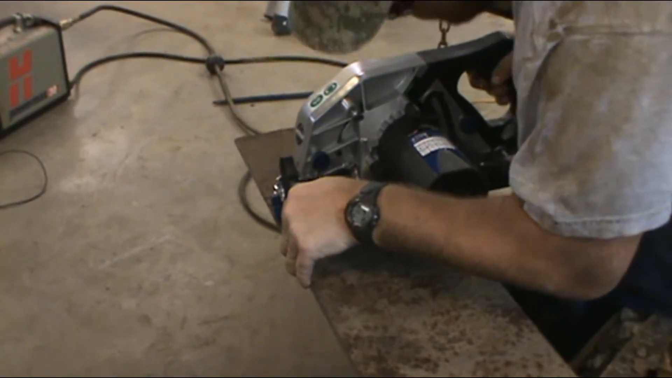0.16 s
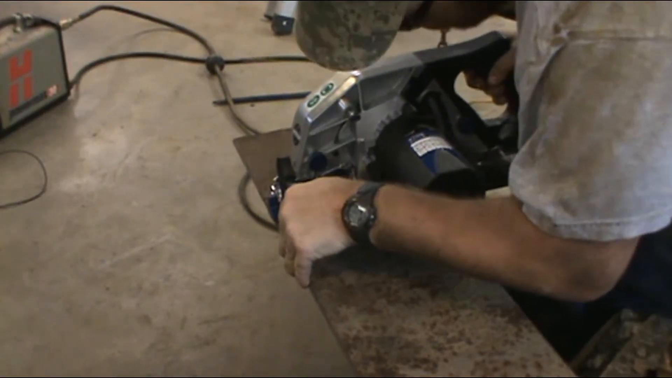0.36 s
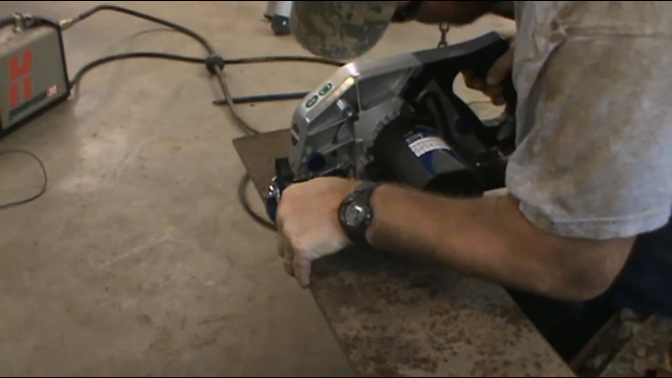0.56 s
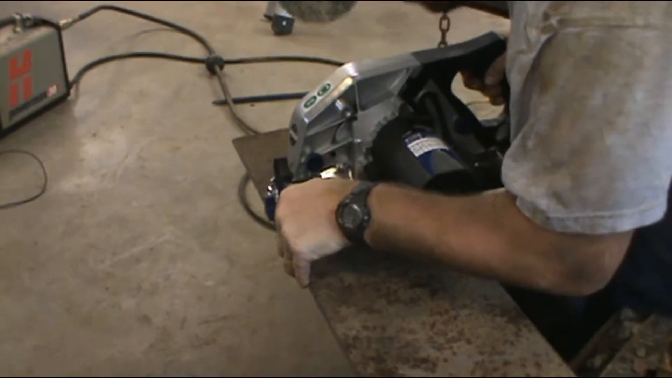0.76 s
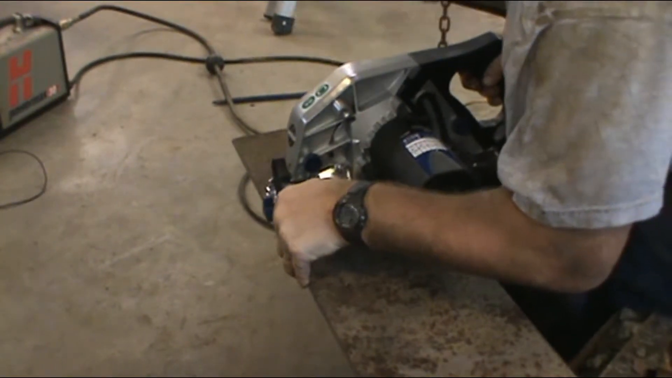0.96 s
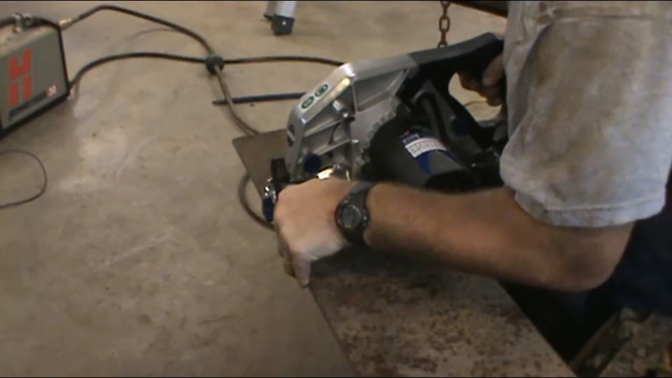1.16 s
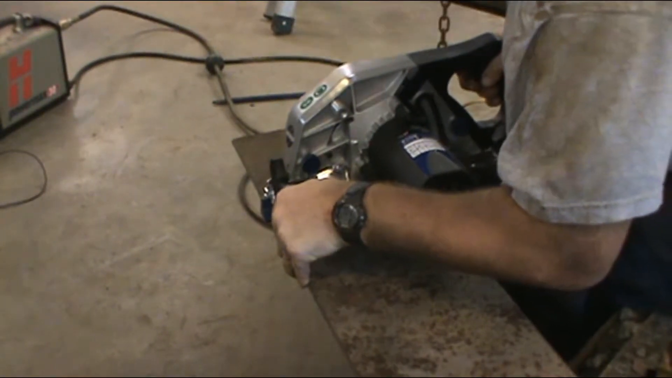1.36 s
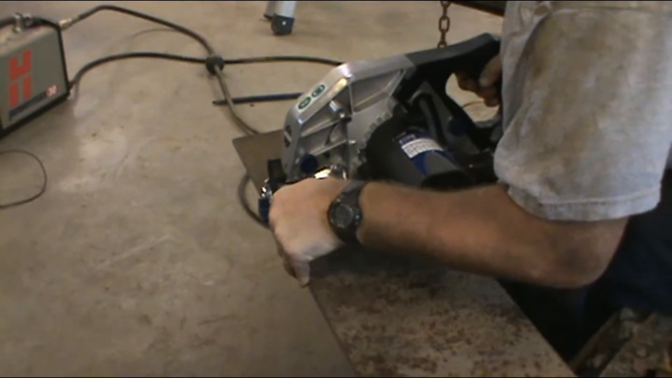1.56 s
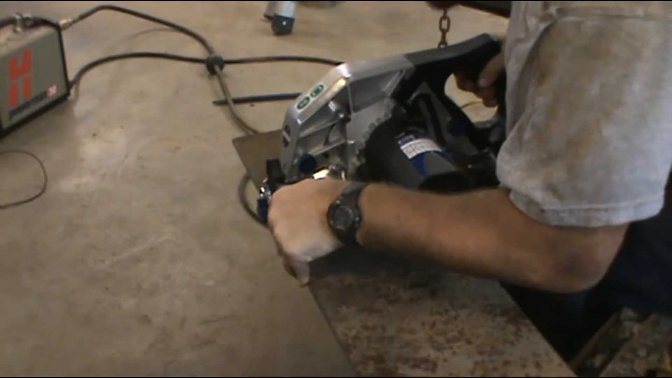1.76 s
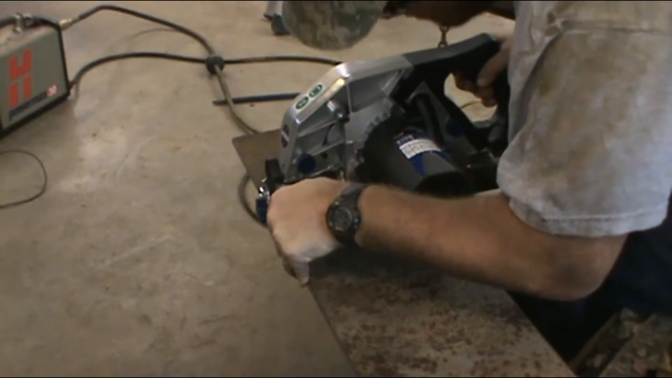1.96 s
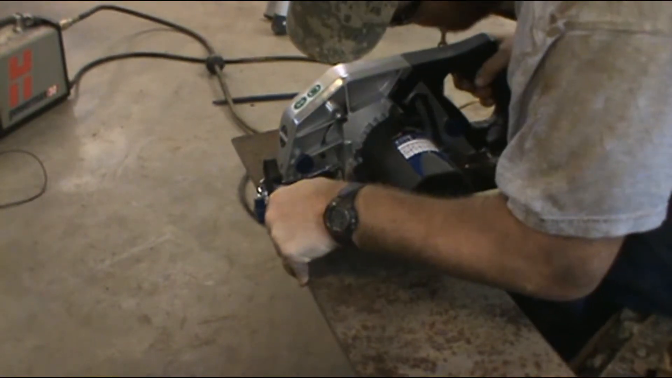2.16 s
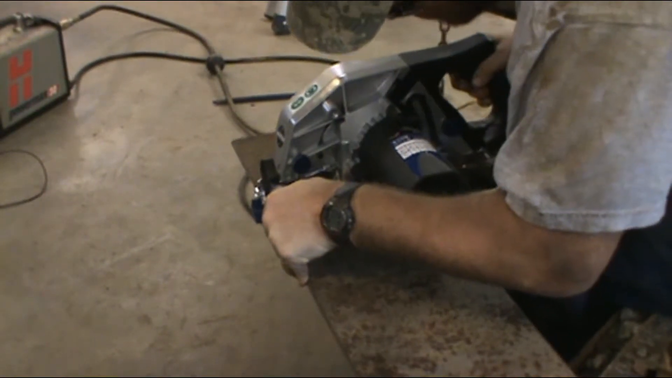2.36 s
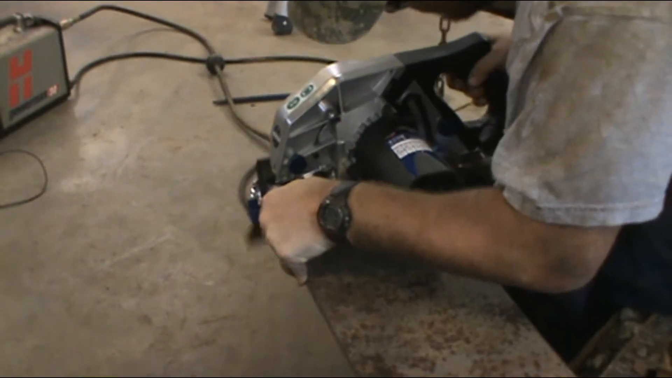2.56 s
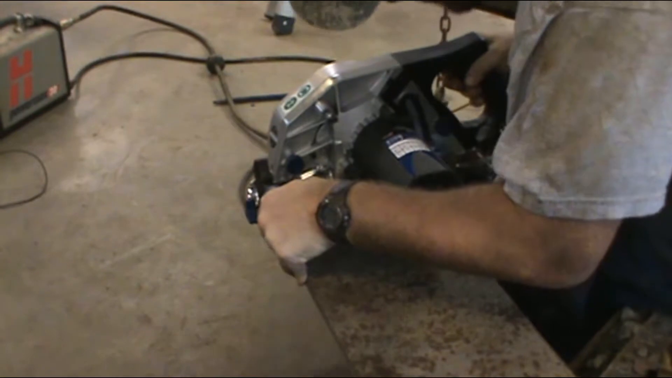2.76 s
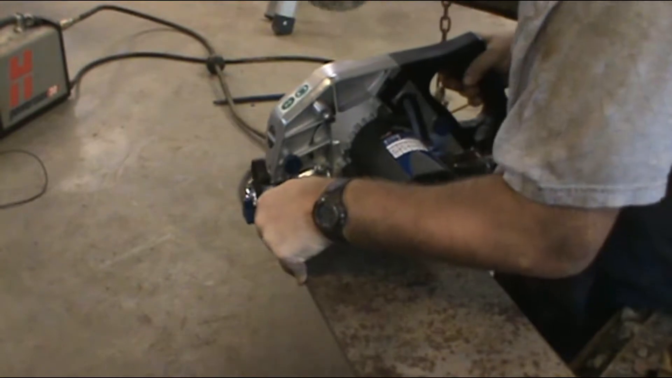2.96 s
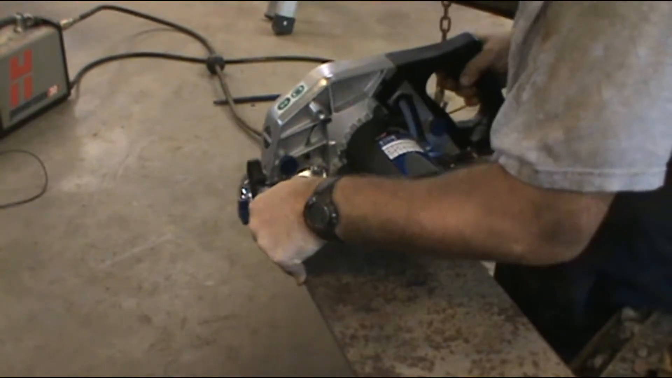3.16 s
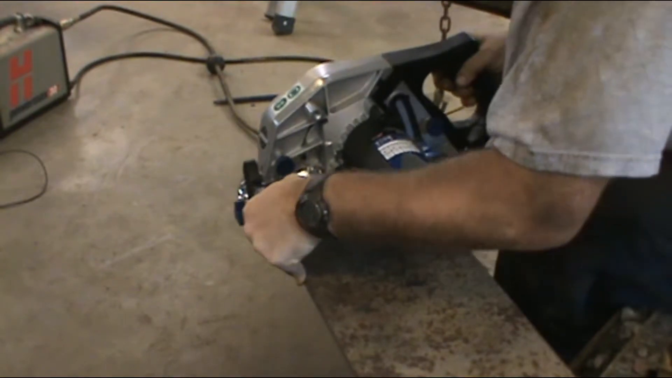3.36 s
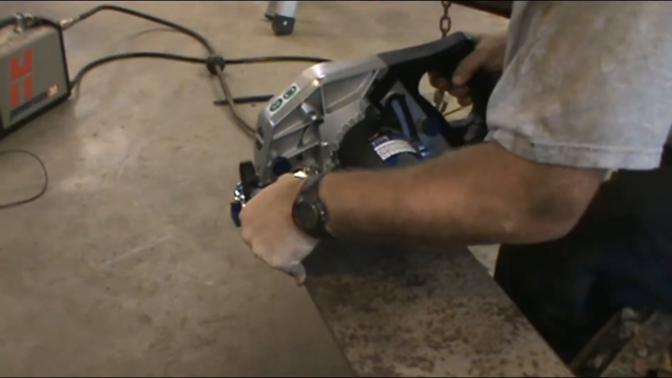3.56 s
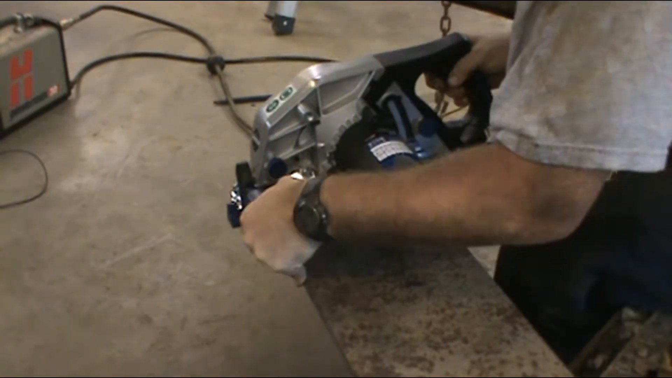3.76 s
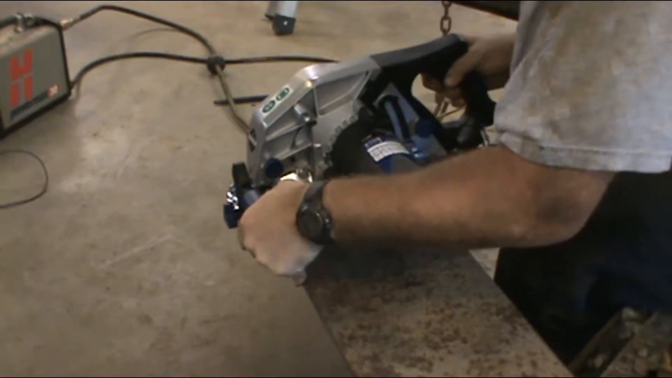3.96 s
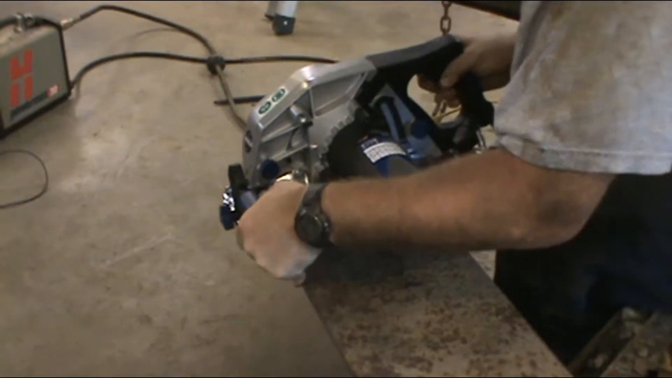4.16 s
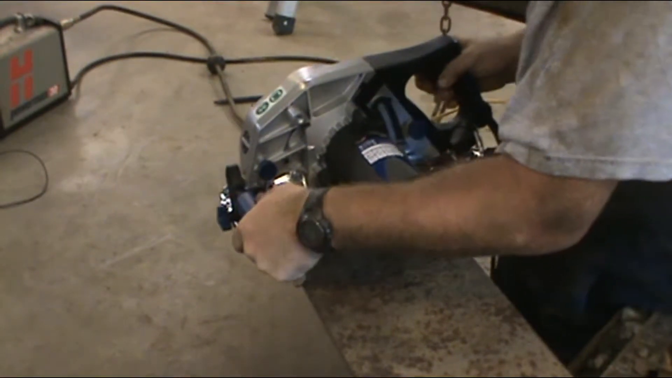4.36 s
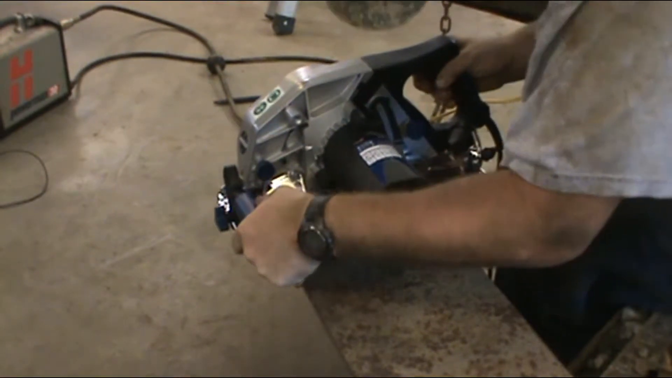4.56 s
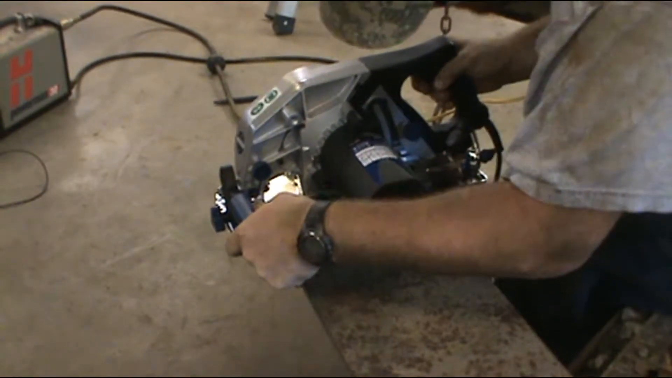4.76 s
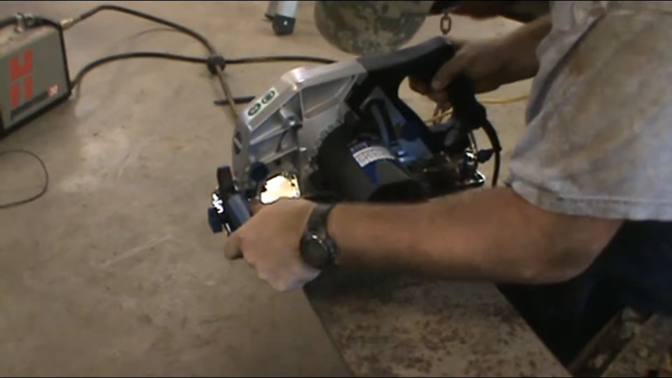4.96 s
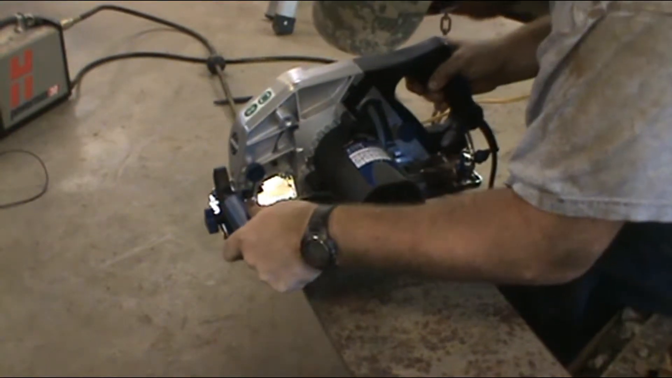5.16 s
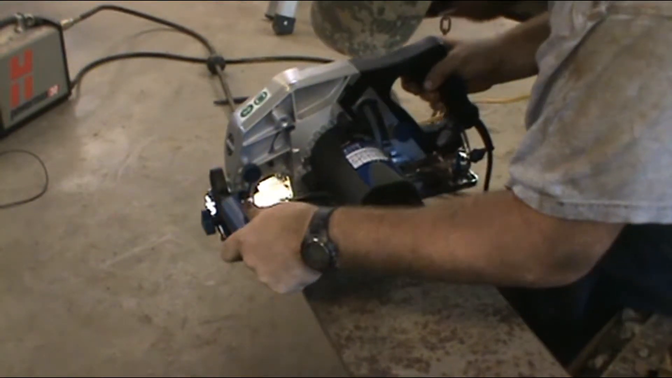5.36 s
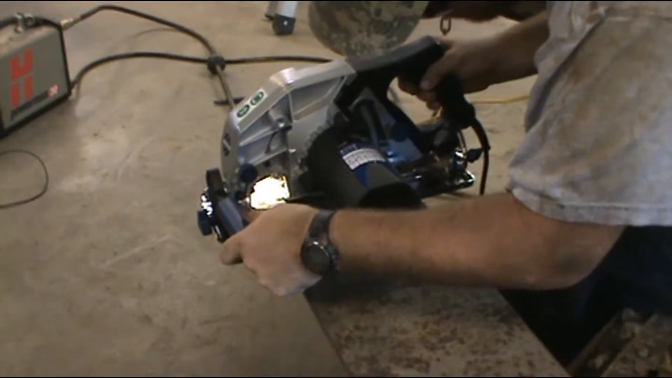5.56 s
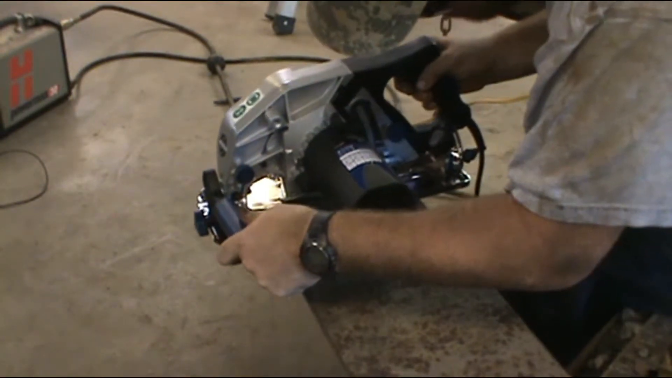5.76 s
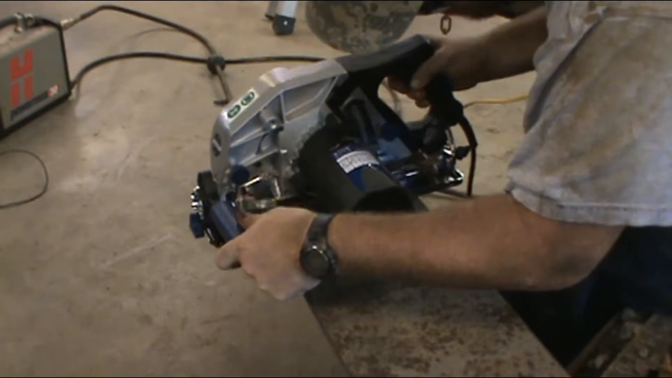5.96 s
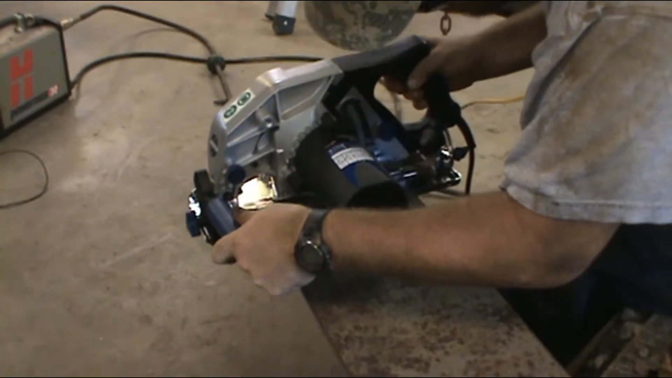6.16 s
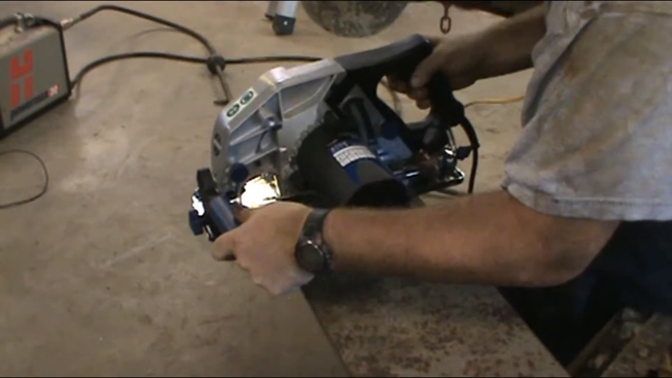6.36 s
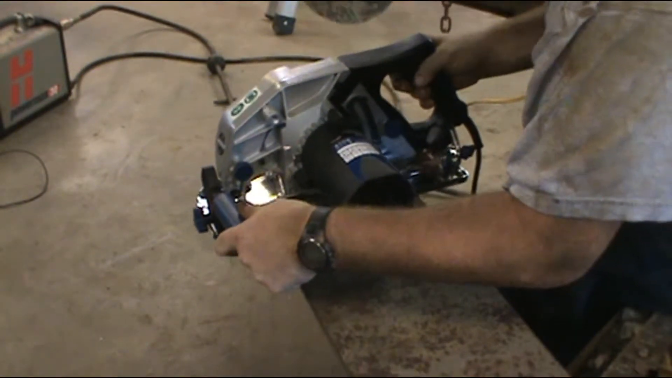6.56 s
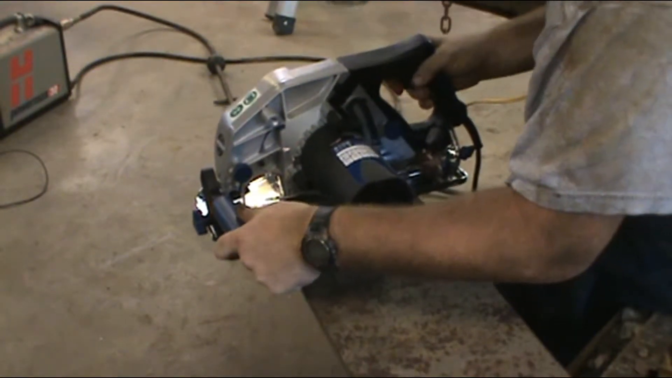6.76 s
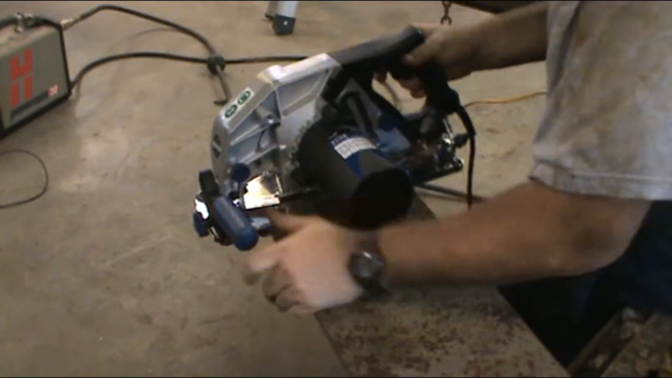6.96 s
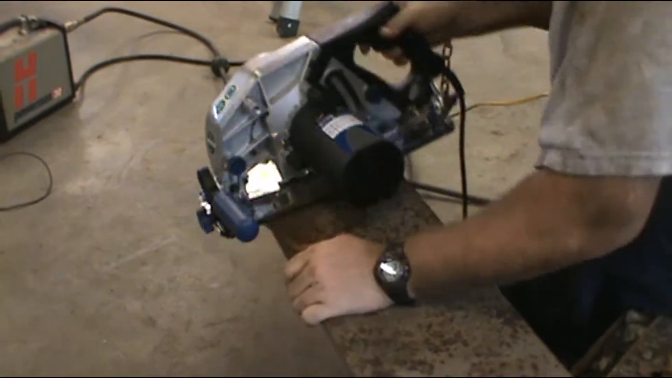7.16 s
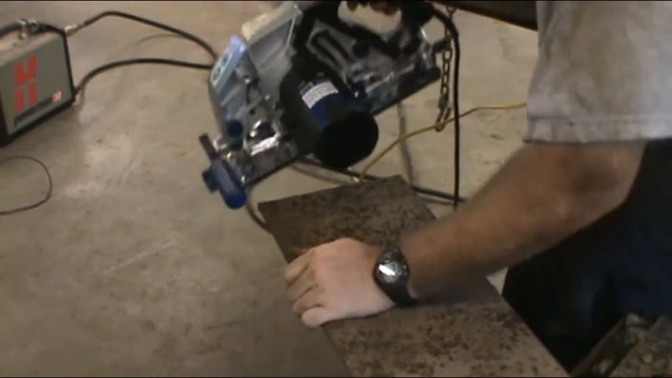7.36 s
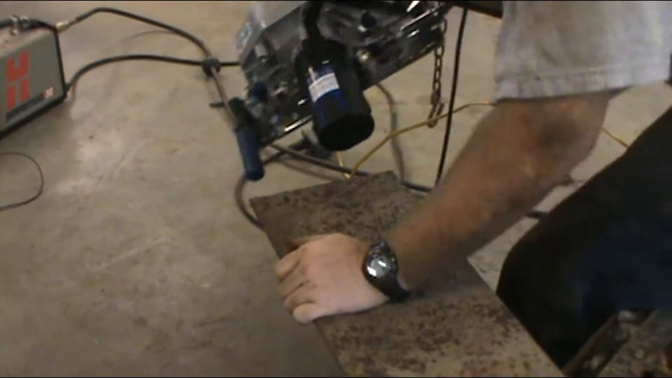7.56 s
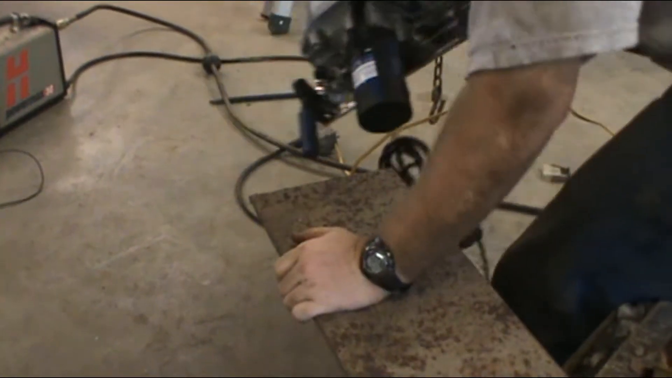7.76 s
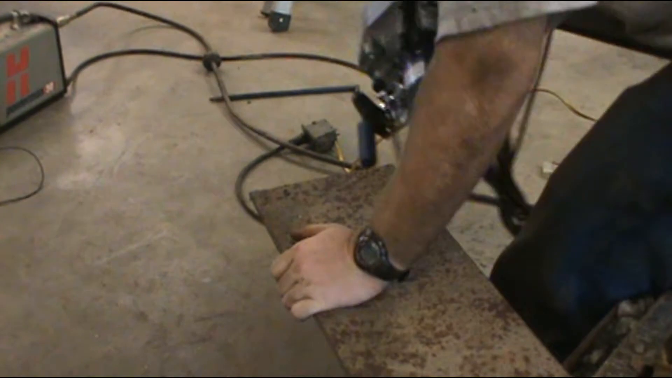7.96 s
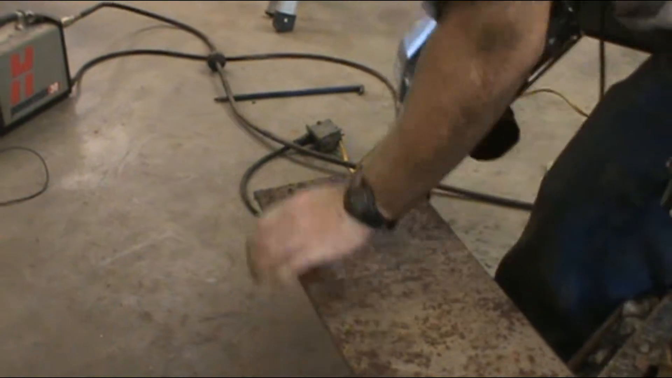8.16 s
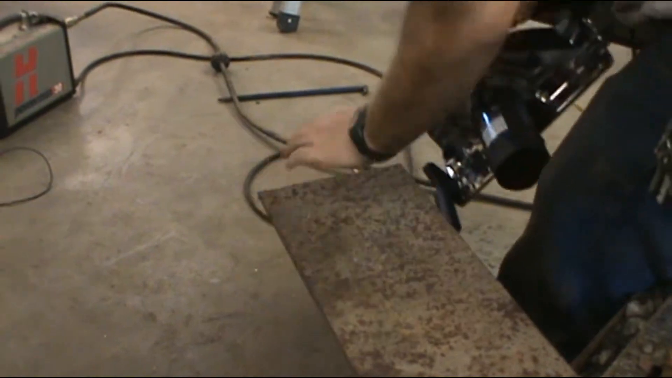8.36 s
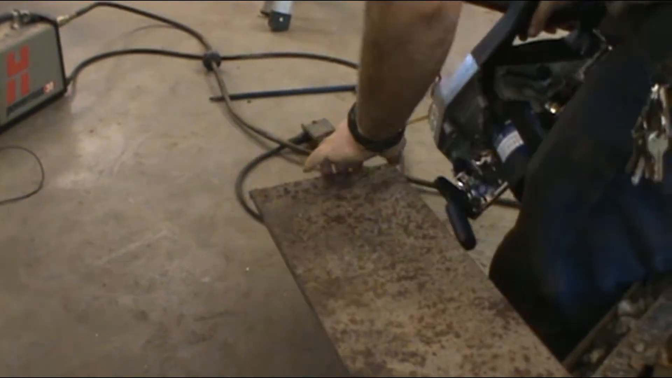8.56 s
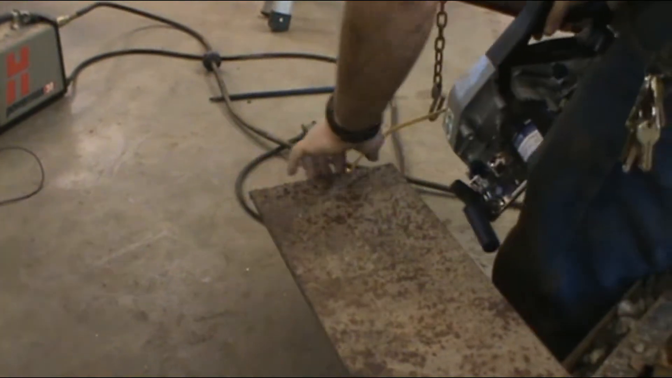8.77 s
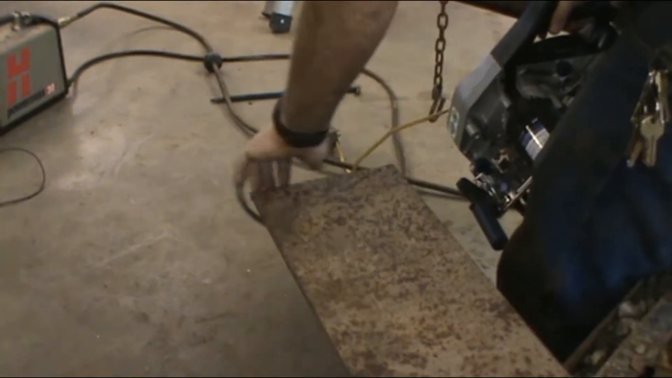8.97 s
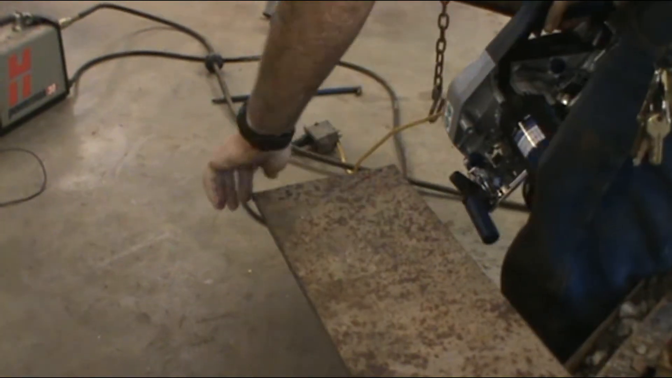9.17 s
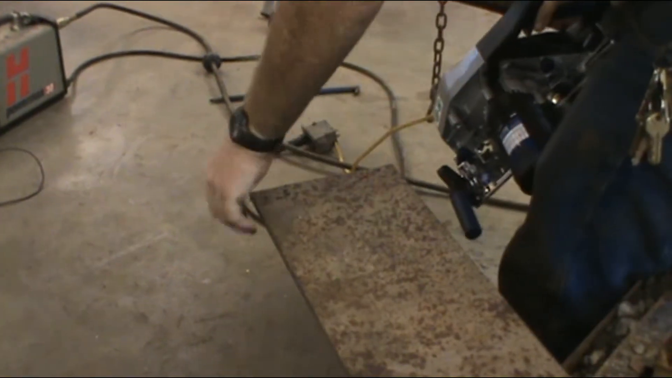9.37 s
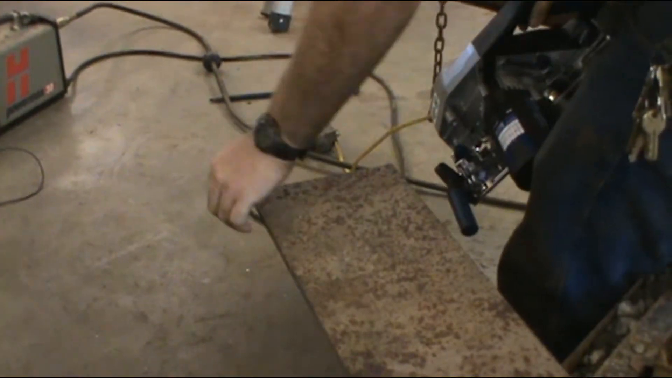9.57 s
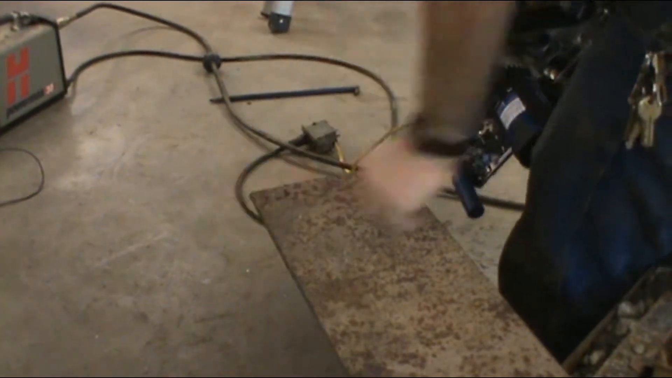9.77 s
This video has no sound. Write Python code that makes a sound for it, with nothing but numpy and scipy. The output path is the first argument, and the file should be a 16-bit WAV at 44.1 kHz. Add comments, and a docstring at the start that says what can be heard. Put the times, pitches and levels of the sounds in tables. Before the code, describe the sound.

A metal-cutting circular saw, very close to the microphone in stereo: dense gritty scraping, sizzling chips, clanking guard and shaking plate. Midway come pinched squeals and squeaks, then a singing tooth whine. Near six seconds the cut ends with a short metallic ring; the motor speeds up, is switched off, and its fan noise and gear rattle sink in pitch, with a dull bump and short room reflections.

```python
"""A hand-held circular saw cuts through steel plate in a workshop, close to the microphone.
Its teeth scrape: noise in tooth-rate bursts rings steel resonances; tones whine as the load eases.
The blade snags, squeals and squeaks in its bending modes; the plate shakes as low stereo rumble.
It breaks through, the motor races briefly, and it coasts down: fan noise, speed-following tones and
gears that rattle as noise pulsed about once a motor turn."""
import sys
import numpy as np
from scipy import signal
from scipy.fft import rfft, irfft
from scipy.io import wavfile
from scipy.ndimage import uniform_filter1d

SR = 44100
rng = np.random.default_rng(int(sys.argv[2]) if len(sys.argv) > 2 else 0)


def int16_out(signal):
    """Quantize to a 16-bit WAV file."""
    q = np.round(np.clip(np.atleast_2d(signal).T, -1, 1) * 32767)
    wavfile.write(sys.argv[1], SR, q.astype(np.int16))


N = 432610
TIME, FREQS = np.arange(N) / SR, np.fft.rfftfreq(N, 1 / SR)  # s, Hz

GEAR_RATIO, TEETH = 7.2, 40  # motor turns per blade turn; teeth on the blade
EXIT_S, FREE_S = 5.91, 5.97  # the last teeth start to leave the plate; the blade comes free
EDGE_HZ = 15900  # upper band limit

# snags of the blade, before each layer's trim:
# (t/s, length/s, lowest mode level/dB, upper modes level/dB, scrape level/dB)
SNAGS = [(2.814, .045, -16, -15, -12), (3.21, .07, -14, -16, -14), (3.383, .035, -16, -23, -17),
         (3.46, .1, -23, -33, -28)]
# how hard the saw is fed into the plate, as the level of the plate's shaking: (t/s, level/dB)
FEED = [(0.0, -35.5), (0.56, -44), (0.92, -35), (1.38, -46), (1.58, -32), (2.1, -44.5), (2.32, -31),
        (2.94, -36), (3.24, -29), (3.29, -35.5), (4.08, -29.5), (4.98, -47.5), (5.75, -44), (5.9, -43)]


def amp(db):
    """Decibels to gain."""
    return 10 ** (np.asarray(db) / 20)


def evened(x):
    """Scales to rms 1."""
    return x / np.sqrt(np.mean(x ** 2) + 1e-20)


def curve(rows):
    """The second column of a table, joined by straight lines in time."""
    times, values = np.array(rows).T
    return np.interp(TIME, times, values)


def wander(hz):
    """Slow chance of rms 1, up to about hz."""
    spectrum = rfft(rng.standard_normal(N))
    return evened(irfft(spectrum / (1 + (FREQS / hz) ** 4), N))


def ring(x, body, modes=(), contrast=0.82):
    """Passes x through a smooth response; any resonances stand on it among a thicket of weak ones."""
    hz, db = np.transpose(body)
    lift = np.ones(len(FREQS))
    for centre_hz, width_hz, lift_db in modes:
        lift += amp(lift_db) ** 2 / (1 + (2 * (FREQS - centre_hz) / width_hz) ** 2) ** 2
    # random ripple along frequency, full above 2 kHz
    thicket_db = 2.3 * wander(90)[:len(FREQS)] * np.minimum(FREQS / 2000, 1) * (len(modes) > 0)
    smooth_db = np.interp(np.log(FREQS + 1), np.log(hz), db)
    response = amp(smooth_db + thicket_db) * np.sqrt(lift) ** contrast
    response /= np.sqrt(1 + (hz[0] / (FREQS + 1)) ** 6)  # low cut at the body's lowest point
    return evened(irfft(rfft(x) * response, N))


def tone(hz, waver, waver_hz=60):
    """A sine of rms 1 whose pitch trembles by an rms share of waver."""
    turns = np.cumsum(hz * (1 + waver * wander(waver_hz))) / SR
    return np.sqrt(2) * np.sin(2 * np.pi * (turns + rng.random()))


def snag_gain(s, length, db, rise=.005, release=.028):
    """A gain that builds in a straight line from s, holds, and dies away exponentially (times in s)."""
    build = np.clip((TIME - s) / rise, 0, 1)
    return amp(db) * build * np.exp(-np.maximum(TIME - s - length, 0) / release)


def motor_speed():
    """Turns per second: held down by the cut, running up once free, coasting after switch-off."""
    # motor speed under the load of the cut: (t/s, f/Hz)
    loaded_rows = [(0, 216), (1.1, 215), (2.0, 245), (3.1, 230), (4.2, 252), (4.6, 291), (4.75, 296),
                   (4.95, 308), (5.28, 304), (5.55, 321)]
    top_hz, run_up_s = 385, .5  # speed it runs up towards, and the time constant
    off_s = 6.76  # trigger released
    drag_s, friction_hz_per_s = 2.0, 29  # air drag's time constant, and constant friction
    loaded = uniform_filter1d(curve(loaded_rows), size=2000, mode="nearest")
    free_s = np.clip(TIME - FREE_S, 0, off_s - FREE_S)
    driven = top_hz + (loaded - top_hz) * np.exp(-free_s / run_up_s)
    friction = friction_hz_per_s * drag_s
    return (driven + friction) * np.exp(-np.maximum(TIME - off_s, 0) / drag_s) - friction


def contact(exit_db_per_s=103):
    """Gain of 1 while the teeth are in the steel, dying quickly as the last ones leave it."""
    return amp(-exit_db_per_s * np.maximum(TIME - EXIT_S, 0))


def effort(db, per_feed, column):
    """Gain of a cutting layer: db at average feed, per_feed dB per dB of feed, swelling at each bite."""
    # the teeth dig in and throw chips, scraping hardest near the end of the cut:
    # (middle t/s, length/s, scrape level/dB, chips level/dB)
    bite_rows = [(0.428, 0.3, -17.5, -33), (0.762, 0.16, -16.5, -34), (1.508, 0.094, -15.5, -37),
                 (2.615, 0.19, -16, -21.5), (3.868, 0.16, -17, -28), (4.26, 0.088, -17.5, -34),
                 (5.732, 0.22, -10, -24)]
    feed_db = curve(FEED)
    feed_db = feed_db - np.mean(feed_db[TIME < FREE_S])
    bites = 0
    for row in bite_rows:
        swell = amp(row[column]) * np.exp(-2 * ((TIME - row[0]) / row[1]) ** 2)
        bites = bites + swell ** 2
    return contact() * np.sqrt(amp(db + per_feed * feed_db) ** 2 + bites)


def shifting(drive, body, modes, contrast):
    """As the teeth move along the slot, the ringing drifts between two sets of weak resonances."""
    angle = .8 * wander(4)
    first, second = (ring(drive * rng.standard_normal(N), body, modes, contrast) for _ in range(2))
    return np.cos(angle) * first + np.sin(angle) * second


def cutting(blade_hz, wobble_db=0.5, bite=0.7, early_db=0.23, late_db=-1.5, spray_db=2,
            snag_db=-3, crack_s=0.011, crack_chips_db=-2):
    """Each tooth tears off a chip: a burst of scraping, decaying over bite tooth gaps, rings the steel."""
    # the steel rings differently as the slot lengthens; broad response: (f/Hz, level/dB),
    # resonances: (f/Hz, width/Hz, lift level/dB before contrast)
    early_body, early_modes = [(400, -32.5), (800, -16.5), (1800, -4), (3500, -8), (5500, -0.5),
                               (9000, -11.5), (11500, -24), (15500, -33)], [(730, 214, 8), (1720, 600, 7), (2727, 149, 4),
                                                   (3583, 45, 9), (4300, 148, 1), (4634, 100, 5),
                                                   (5100, 350, 3), (5760, 130, 6), (6671, 268, 3),
                                                   (7030, 50, 11), (7830, 258, 8), (8290, 157, 8),
                                                   (8792, 83, 7), (9101, 73, 7), (9811, 238, 7)]
    mid_body, mid_modes = [(400, -10.5), (800, 0), (1800, 2.5), (3500, -2), (5500, 2.5), (9000, -4.5),
                           (11500, -21), (15500, -29)], [(687, 56, 4), (1327, 48, 6), (1635, 287, 6), (3010, 71, 6),
                                             (3574, 62, 9), (3780, 39, 11), (4608, 50, 10), (5351, 137, 7),
                                             (5780, 200, 3), (6539, 81, 6), (7249, 43, 13), (7790, 180, 4),
                                             (8629, 25, 12), (9724, 47, 9)]
    late_body, late_modes = [(400, -12.5), (800, -10.5), (1800, 6.5), (3500, -0.5), (5500, 1), (9000, -2.5),
                             (11500, -20), (15500, -26)], [(450, 24, 7), (827, 183, 8), (1705, 36, 8), (2490, 45, 4),
                                                (3519, 43, 5), (3806, 71, 6), (4087, 50, 7), (4225, 30, 11),
                                                (4651, 50, 13), (4897, 31, 9), (5066, 173, 4),
                                                (5858, 171, 6), (6471, 96, 5), (7593, 44, 8),
                                                (9254, 28, 10), (9714, 27, 11)]
    # (t/s, stage of the cut: 0 early, 1 middle, 2 near the edge)
    stage_rows = [(1.9, 0), (2.55, 1), (4.1, 1), (4.55, 2)]
    # broad response of the flying chips: (f/Hz, level/dB)
    sizzle_body = [(7000, 6.5), (10500, -5.5), (15500, -11)]

    turns = np.cumsum(blade_hz) / SR
    bursts = 1 + np.exp(-(turns * TEETH % 1) / bite)
    drive = bursts * amp(wobble_db * np.sin(2 * np.pi * turns) + 0.5 * wander(39))
    stages = [amp(early_db) * shifting(drive, early_body, early_modes, contrast=1.12),
              shifting(drive, mid_body, mid_modes, contrast=0.92),
              amp(late_db) * shifting(drive, late_body, late_modes, contrast=1.35)]
    stage = curve(stage_rows)
    # equal-power crossfade from stage to stage
    steel = sum(np.sqrt(np.maximum(1 - abs(stage - k), 0)) * sound for k, sound in enumerate(stages))
    cracks = amp(snag_db) * sum(snag_gain(s, crack_s, db) for s, *_, db in SNAGS)
    chips = ring(drive * rng.standard_normal(N) * amp(2 * wander(900)), sizzle_body)
    scrape = effort(db=-15.5, per_feed=0.25, column=2)
    spray = effort(db=-36, per_feed=0.33, column=3) * amp(spray_db * wander(11))
    return steel * (scrape + cracks) + chips * (spray + amp(crack_chips_db) * cracks)


def whine(blade_hz, light_db=-22.0, run_out=0.011, flutter_db=1.0, first_db=-33.5, first_fade_db=7):
    """Under light load the teeth strike evenly and sing; the blade's run-out sways the note once a turn."""
    # tooth rate and weaker tones from uneven teeth:
    # (multiple of the blade's turning rate, level/dB, waver as a share)
    order_rows = [(19, -20, .002), (20, -19, .002), (21, -21, .002), (38, -11, .002), (39, -6, .002),
                  (40, 0, .003), (240, -25, .003)]
    # light load: (start t/s, length/s, rise/s, release/s)
    singing_span = (4.4, 1.22, 0.21, 0.064)
    # resonance that swells the tooth tone as it sweeps through: (f/Hz, width/Hz, level/dB)
    whine_peak = (1705, 30, -22.5)

    sway = np.sin(2 * np.pi * np.cumsum(blade_hz) / SR)  # also +-1 dB of level
    start, length, rise, release = singing_span
    singing = snag_gain(start, length, 0, rise, release)
    peak_hz, width_hz, peak_db = whine_peak
    swell = singing * amp(peak_db) / (1 + (2 * (TEETH * blade_hz - peak_hz) / width_hz) ** 2)
    # a fainter whine from the start fades by first_fade_db per second
    strength = amp(light_db) * singing + amp(first_db - first_fade_db * TIME)
    tones = 0
    for k, db, waver in order_rows:
        gain = amp(db) * (strength + swell * (k == TEETH))
        tones = tones + gain * tone(k * blade_hz * (1 + run_out * sway), waver)
    return contact() * amp(sway + flutter_db * wander(70)) * tones


def chatter(level_db=-29, per_s=110, clank_hz=1750, ring_s=0.0035):
    """At random, about 110 times a second, a tooth hits harder and makes the blade guard clank."""
    t = np.arange(SR // 20) / SR
    hits = (rng.random(N) < per_s / SR) * rng.uniform(-0.97, 1, N)
    clank = np.exp(-t / ring_s) * np.sin(2 * np.pi * clank_hz * t)
    return amp(level_db) * contact() * evened(signal.oaconvolve(hits, clank)[:N])


def squeals(ring_s=0.07):
    """A pinched blade rings in its bending modes; the lowest yields first, the upper ones build slower."""
    # modes of the snagged blade, lowest first: (f/Hz, level/dB relative to the snag)
    mode_rows = [(1080, -1), (1556, -3), (2734, -5), (2864, -9), (3370, -4), (4590, -10), (5935, -10)]
    lowest = sum(snag_gain(s, length / 2, db, rise=.006, release=ring_s) for s, length, db, _, _ in SNAGS)
    upper = sum(snag_gain(s, length, db, rise=.01, release=.04) for s, length, _, db, _ in SNAGS)
    modes = [amp(db + 2 * wander(50)) * tone(hz, waver=11 / hz) for hz, db in mode_rows]
    return lowest * modes[0] + upper * sum(modes[1:])


def squeaks(level_db=-1.5, flutter_db=2):
    """The blade's flank sticks and slips, and one mode rings out unsteadily above the rest."""
    # the rubbing blade locks on to a mode: (t/s, length/s, f/Hz, level/dB before level_db)
    squeak_rows = [(.72, .4, 5770, -29), (.88, .2, 7019, -27), (2.42, .1, 6546, -28),
                   (2.815, .06, 7256, -21), (3.215, .09, 4403, -21), (3.33, .09, 4403, -27),
                   (3.46, .13, 2742, -24), (3.63, .52, 4600, -27), (4.0, .15, 1701, -25),
                   (4.25, .2, 3580, -26), (4.27, .25, 4605, -22), (4.4, .05, 1510, -20),
                   (5.05, .29, 2500, -29), (5.18, .15, 4655, -27), (5.45, .3, 4220, -27),
                   (5.54, .28, 3628, -27), (8.76, .17, 2024, -49)]
    t, out = np.arange(SR) / SR, np.zeros(N + SR)
    for s, length, hz, db in squeak_rows:
        noises = rng.standard_normal((2, SR))
        flutter, tremble = (evened(np.convolve(row, np.hanning(600), "same")) for row in noises)
        gain = amp(db + level_db + flutter_db * flutter) * snag_gain(0, length, 0, rise=.02)[:SR]
        turns = hz * t + np.cumsum(10 * tremble) / SR  # pitch trembles by 10 Hz rms
        out[round(s * SR):][:SR] += np.sqrt(2) * gain * np.sin(2 * np.pi * turns)
    return out[:N]


def ring_out(rise_db_per_s=73):
    """The blade's ringing builds until the teeth leave the plate, then dies away."""
    # modes of the freed blade: (f/Hz, level/dB at the exit, 60 dB decay/s)
    ring_rows = [(6470, -23, 0.57), (8800, -37, 1.2)]
    before, after = np.minimum(TIME - EXIT_S, 0), np.maximum(TIME - EXIT_S, 0)
    return sum(amp(db - 60 * after / t60 + rise_db_per_s * before) * tone(hz, waver=0.00072)
               for hz, db, t60 in ring_rows)


def motor(shaft_hz, fan_db=-25.5, fan_power=2.36, whistle_db=-5, hum_db=-32, tones_db=-3,
          tones_power=1.15):
    """The fan rushes and its 12 blades whistle; the rotor hums; the commutator adds thin tones."""
    # broad response of the fan: (f/Hz, level/dB)
    fan_body = [(60, -18), (110, -14), (450, -17.5), (700, 3), (1000, 0.5), (1700, 7), (2800, 0), (4400, 6),
                (8700, -4.5), (11000, -19), (15500, -23)]
    # tones of the 24-bar commutator: (multiple of the shaft rate, level/dB before tones_db and fan_db)
    commutator_rows = [(24, -19), (48, -27), (72, -29), (96, -28)]
    speed = shaft_hz / shaft_hz.max()
    rush = ring(rng.standard_normal(N) * amp(wander(130)), fan_body)
    whistle = amp(whistle_db + 2.5 * wander(70)) * tone(12 * shaft_hz, waver=.005) * speed ** 4
    hum = amp(hum_db) * tone(shaft_hz, waver=.003) * speed ** 2
    tones = 0
    for k, db in commutator_rows:
        in_band = k * shaft_hz < EDGE_HZ
        tones = tones + amp(db + 4 * wander(30)) * tone(k * shaft_hz, waver=.006) * in_band
    fan = speed ** fan_power * (rush + whistle + hum)
    return amp(fan_db) * (fan + speed ** tones_power * amp(tones_db) * tones)


def whirr(shaft_hz, loudest_turns_hz=120, spread=.6, stack_db=-9, count=56):
    """Uneven gear teeth repeat one rough pattern a motor turn; tones stand out as coasting gears run slack."""
    # strongest gear tones: (multiple of the shaft rate, level/dB against the grinding at their loudest)
    order_rows = [(3, -16), (4.8, -17), (13.8, -15), (34.6, -18), (41.5, -16), (56, -20)]
    pattern = irfft(np.exp(2j * np.pi * rng.random(count)), 8192)  # equal harmonics, random phases
    turns = np.cumsum(shaft_hz * (1 + .022 * wander(60))) / SR
    stack = evened(pattern[(turns % 1 * len(pattern)).astype(int)])
    tones = sum(amp(db + 4 * np.tanh(wander(12))) * tone(k * shaft_hz, waver=.02) for k, db in order_rows)
    slack = np.exp(-(np.log(shaft_hz / loudest_turns_hz) / spread) ** 2)
    return amp(stack_db) * stack + tones * slack


def gears(shaft_hz, level_db=-37.5, power=0.084, knock_s=0.004, uneven_db=3.0, grind=1.0,
          dull_hz=3000, bright_turns_hz=85):
    """Gears whirr and knock through their play about once a motor turn; slow knocks ring duller."""
    # broad response of the housing: (f/Hz, level/dB)
    gear_body = [(200, -12), (380, -15.5), (550, -1), (1400, -2), (2900, 4), (4500, 8.5), (6500, 9.5),
                 (9000, 0), (11000, -14.5), (15000, -31)]
    # its resonances: (f/Hz, width/Hz, lift level/dB before contrast)
    gear_modes = [(580, 67, 7), (890, 73, 6), (1100, 340, 8.5), (1720, 1060, 11), (2480, 200, 9),
                  (3750, 120, 3), (5150, 110, 8)]
    turns = np.floor(np.cumsum(shaft_hz * (1 + .2 * wander(50))) / SR)
    strengths = amp(uneven_db * np.clip(rng.standard_normal(N), -2, 2))
    knocks = (np.diff(turns, prepend=0) > 0) * strengths
    age = np.arange(SR // 10) / (knock_s * SR)  # in knock lengths
    force = grind + signal.oaconvolve(knocks, age * np.exp(1 - age))[:N]
    force /= np.sqrt(uniform_filter1d(force ** 2, size=SR // 4))  # even level over a quarter second
    rattle = ring(force * (rng.standard_normal(N) + whirr(shaft_hz)), gear_body, gear_modes)
    dull = irfft(rfft(rattle) / (1 + (FREQS / dull_hz) ** 4), N)
    bright = np.tanh((shaft_hz / bright_turns_hz) ** 2)
    level = amp(level_db) * (shaft_hz / shaft_hz.max()) ** power
    return level * (dull + bright * (rattle - dull))


def blade_song(shaft_hz):
    """Air keeps the spinning blade singing faintly; speed stiffens it and raises the pitch."""
    # (f/Hz at rest, rise as a share per motor turn per second, level/dB at highest speed,
    #  power of the speed that the level follows)
    song_rows = [(2110, .00047, -39.5, 1.5), (1590, .00042, -39.5, 6)]
    speed = shaft_hz / shaft_hz.max()
    song = 0
    for hz, rise, db, power in song_rows:
        level = amp(db + 2 * wander(14)) * speed ** power
        song = song + level * tone(hz * (1 + rise * shaft_hz), waver=.002)
    return song


def chirps(centre_hz=4930, fall_hz_per_s=30000, length_s=.004):
    """Each dry chirp of the free-running spindle is a few milliseconds of quickly falling whistle."""
    # (middle t/s, level/dB)
    chirp_rows = [(6.177, -32), (6.259, -27), (6.296, -28), (6.317, -32), (6.384, -28), (6.457, -32),
                  (6.492, -30)]
    out = np.zeros(N)
    for s, db in chirp_rows:
        near = abs(TIME - s) < 10 * length_s
        t = TIME[near] - s
        whistle = np.sin(2 * np.pi * (centre_hz - fall_hz_per_s * t / 2) * t)
        out[near] += np.sqrt(2) * amp(db) * np.exp(-(t / length_s) ** 2) * whistle
    return out


def shake(left_db=-4.0, right_db=1.5, apart=0.8, rocking_db=-4, settle_db_per_s=45, bump_s=0.084,
          room_db=-63, boom_hz=102, boom_width=25, boom_db=-2, drone_db=12):
    """The plate and its stand rumble under the feed and at each bump, over the low drone of the room."""
    # broad response of plate and stand: (f/Hz, level/dB)
    shake_body = [(40, -14), (60, -6), (75, 3), (200, 4), (330, -2.5), (600, -0.5), (1100, -24)]
    # the rocking plate pushes air to one side as it draws from the other: (f/Hz, level/dB)
    rocking_body = [(200, -2), (330, 0.5), (600, -4), (900, 2), (1500, -35)]
    # dull bumps as the saw leaves the plate and is lifted away: (t/s, level/dB before the side trims)
    bump_rows = [(5.97, -55), (6.98, -59), (7.24, -48.5)]
    shared = rng.standard_normal(N) + apart * rng.standard_normal((2, N))
    force = amp(curve(FEED) - settle_db_per_s * np.maximum(TIME - EXIT_S, 0))
    force += sum(snag_gain(s, 0, db, release=bump_s) for s, db in bump_rows)
    rumble = force * ring(shared, shake_body, [(boom_hz, boom_width, boom_db)])
    rocking = force * amp(rocking_db) * ring(rng.standard_normal(N), rocking_body)
    drone = amp(room_db) * ring(rng.standard_normal((2, N)), shake_body, [(boom_hz, 12, drone_db)])
    return (rumble + drone) * amp([[left_db], [right_db]]) + np.array([rocking, -rocking])


def workshop(x, wet_db, t60=0.2):
    """Direct sound plus sparse scattered reflections, different at each ear, falling 60 dB in t60 s."""
    t = np.arange(SR // 2) / SR
    sparse = rng.random((2, len(t))) < 1 / 10
    taps = rng.standard_normal((2, len(t))) * sparse * amp(-60 * t / t60)
    taps /= np.linalg.norm(taps, axis=1, keepdims=True)
    return x + amp(wet_db) * signal.fftconvolve(x[None], taps, axes=1)[:, :N]


def scene():
    """The saw in the cut, then running free, in the room."""
    shaft_hz = motor_speed()
    blade_hz = shaft_hz / GEAR_RATIO
    cut = cutting(blade_hz) + whine(blade_hz) + chatter() + squeals() + squeaks() + ring_out()
    machine = motor(shaft_hz) + gears(shaft_hz) + blade_song(shaft_hz) + chirps()
    machine_sides = amp([[0], [-.9]])  # a little weaker on the right
    return workshop(cut, wet_db=-10.5) + workshop(machine, wet_db=-11.0) * machine_sides + shake()


def record(dry, hollow_hz=7450, hollow_width=300, hollow_db=-6):
    """The microphone hollows one narrow treble band; peaks round off near full scale; then the band limit."""
    hollow = np.exp(-(2 * (FREQS - hollow_hz) / hollow_width) ** 2)
    heard = irfft(rfft(dry) * amp(hollow_db * hollow), N)
    rounded = heard / (1 + heard ** 6) ** (1 / 6)
    low_pass = signal.firwin(511, EDGE_HZ, window=("kaiser", 9), fs=SR)
    return signal.oaconvolve(rounded, low_pass[None], "same")


dry = scene()
out = record(dry)
int16_out(out)
```